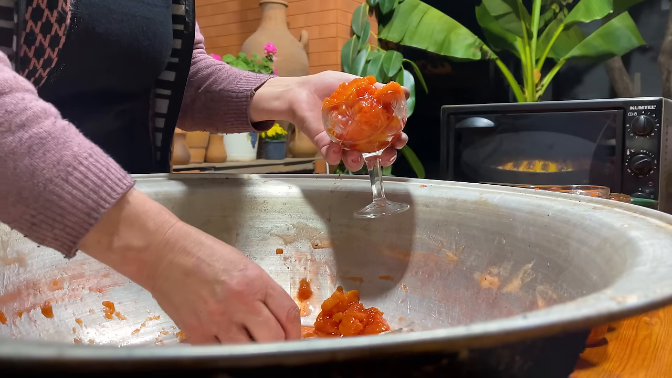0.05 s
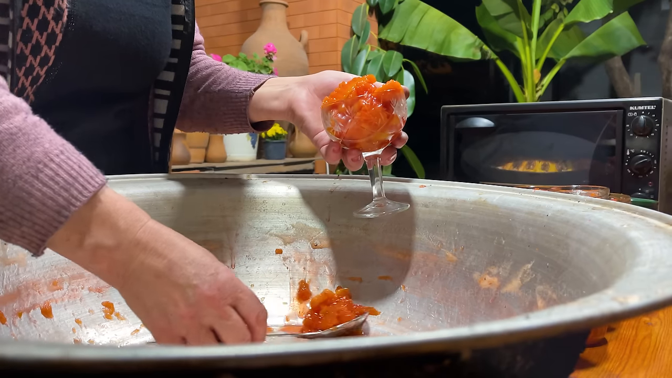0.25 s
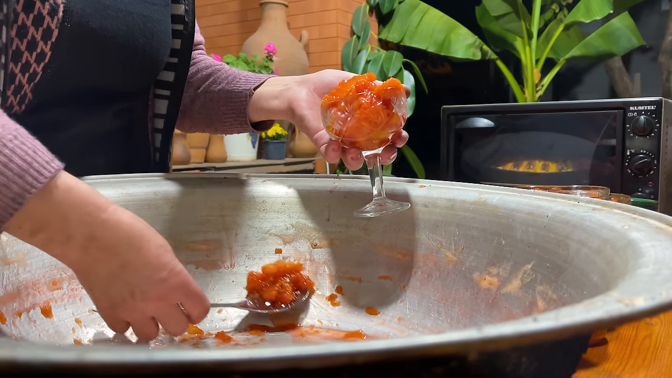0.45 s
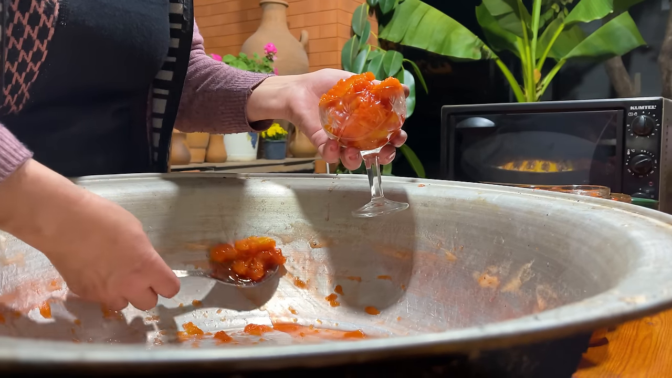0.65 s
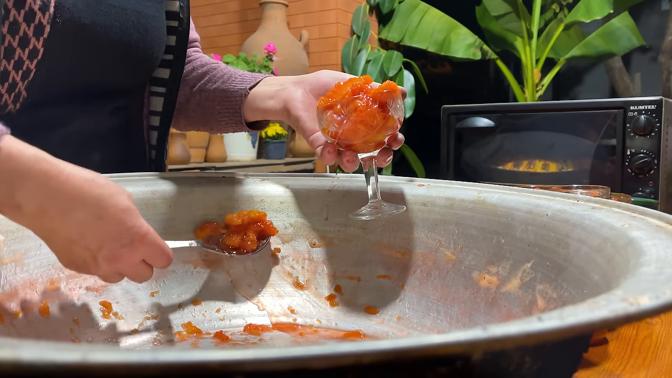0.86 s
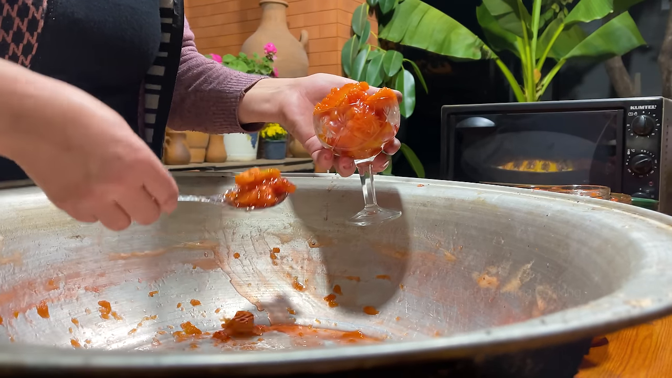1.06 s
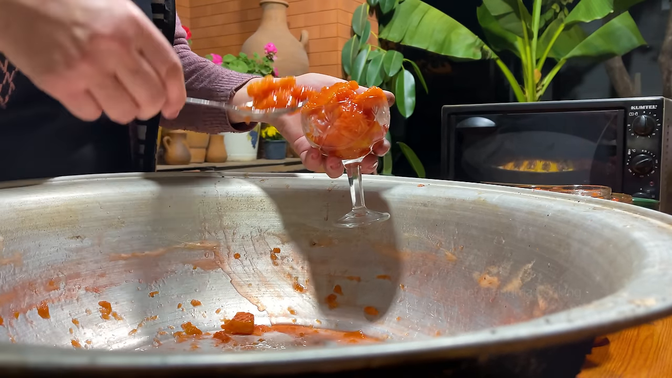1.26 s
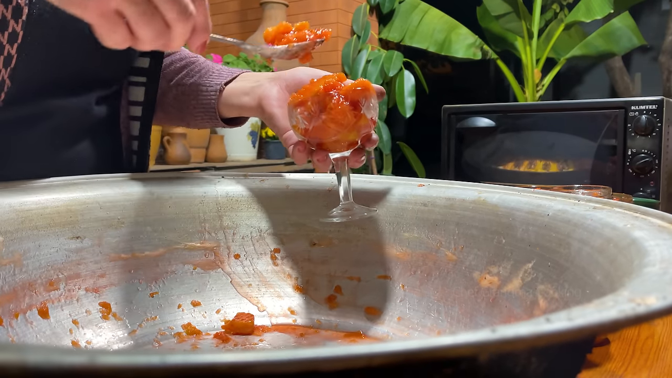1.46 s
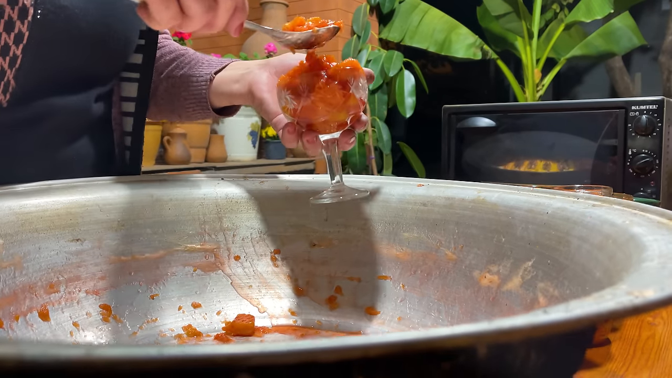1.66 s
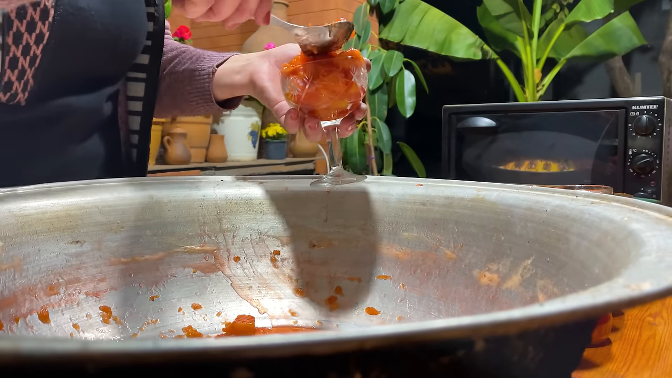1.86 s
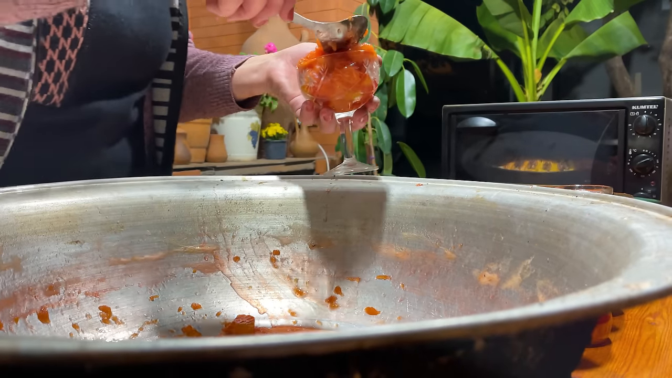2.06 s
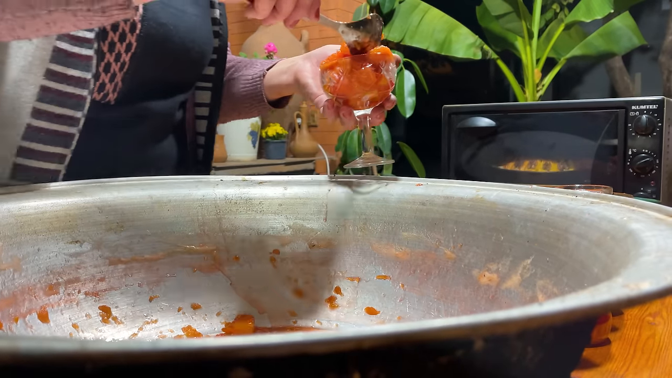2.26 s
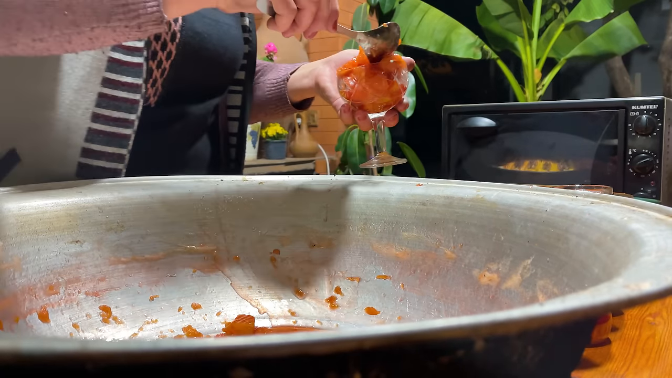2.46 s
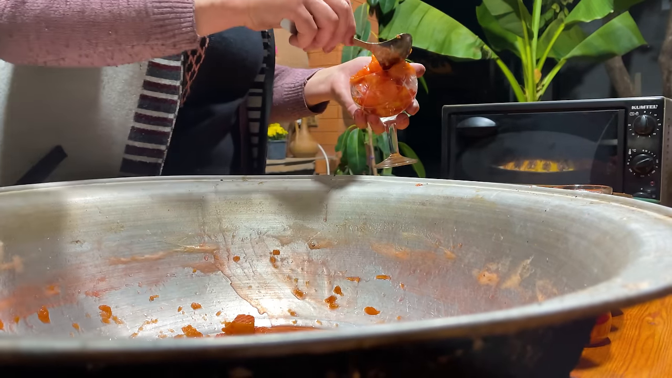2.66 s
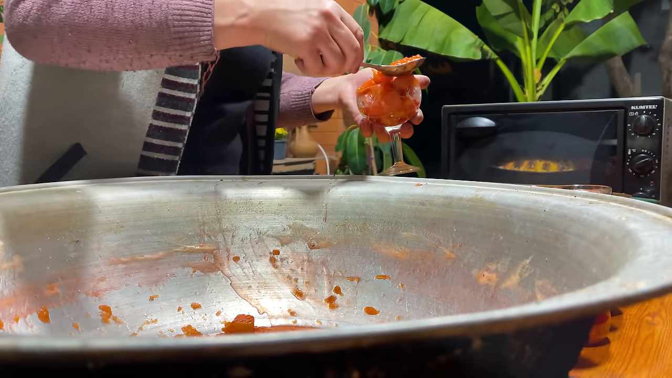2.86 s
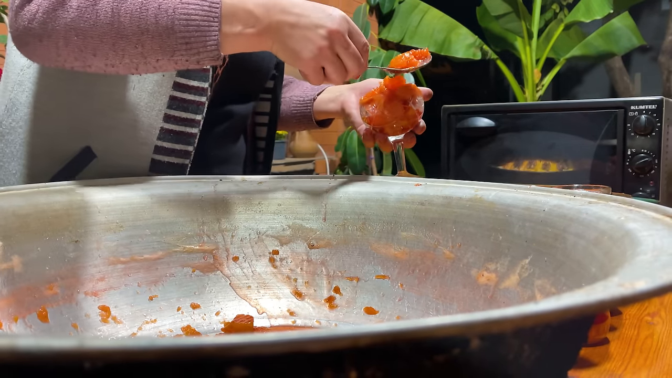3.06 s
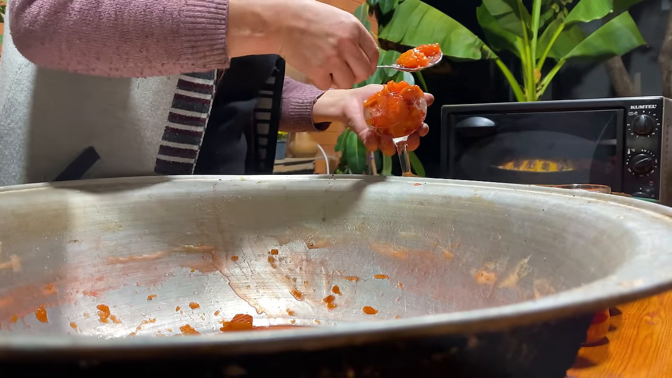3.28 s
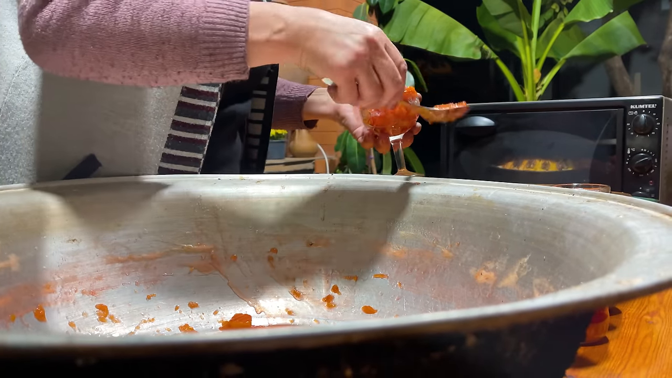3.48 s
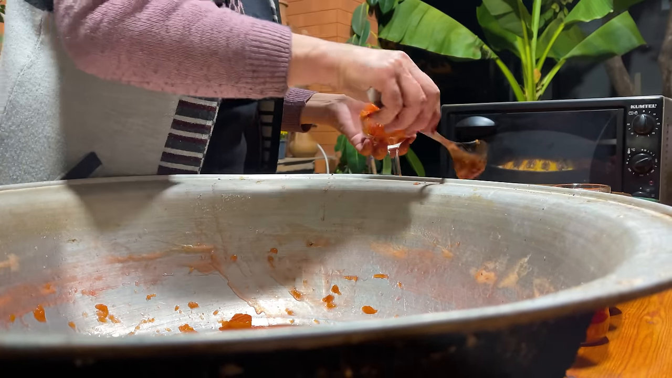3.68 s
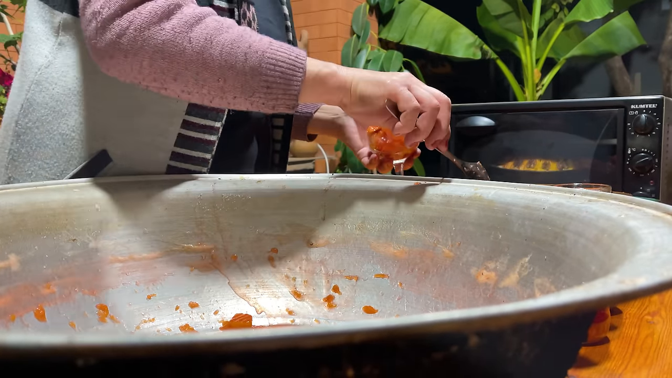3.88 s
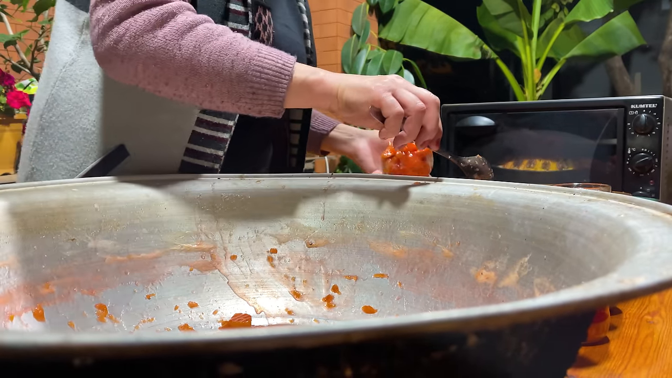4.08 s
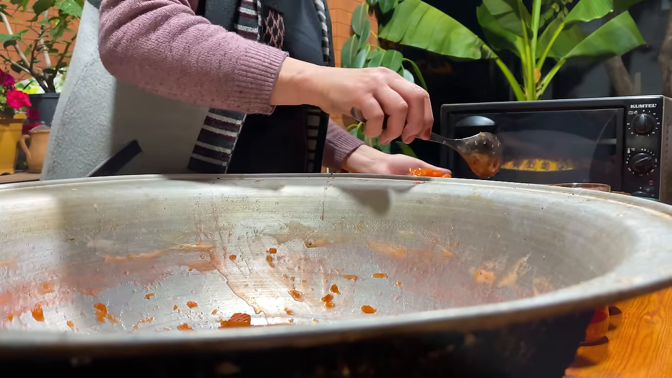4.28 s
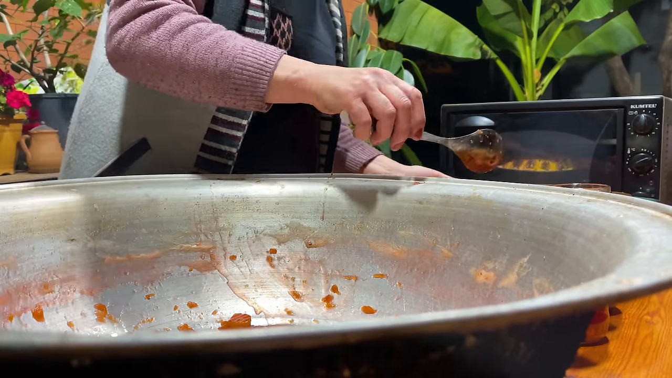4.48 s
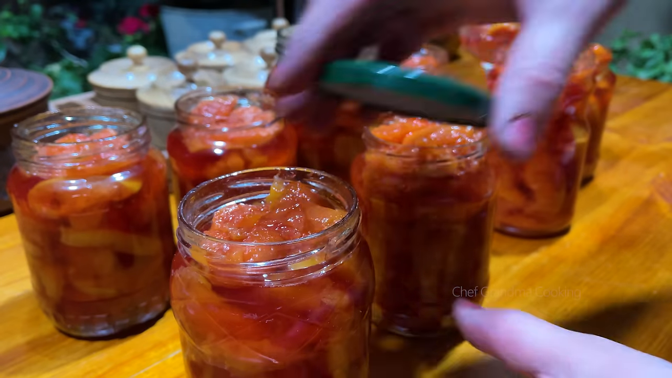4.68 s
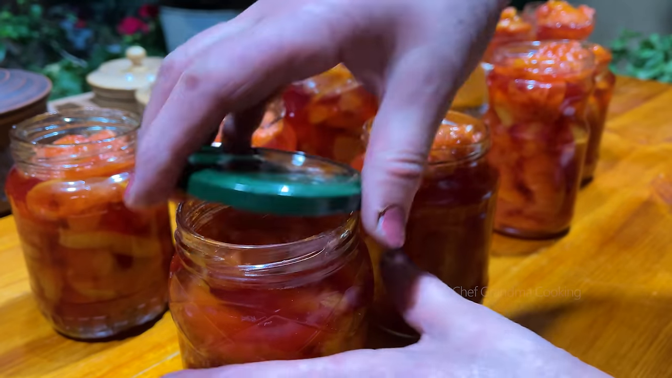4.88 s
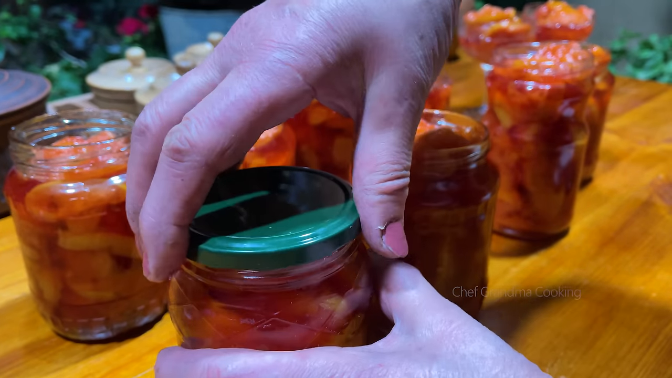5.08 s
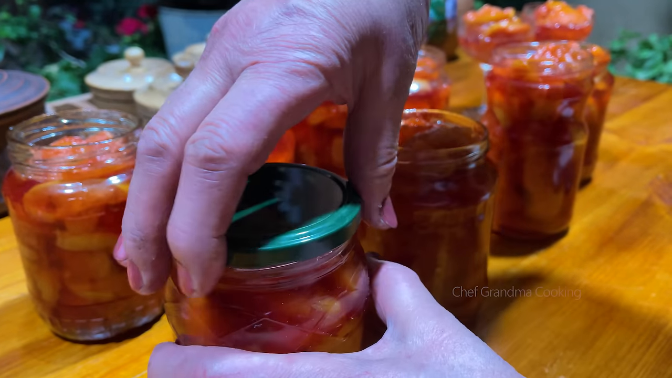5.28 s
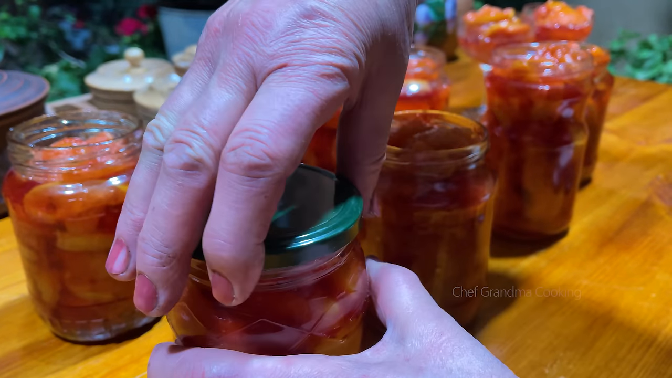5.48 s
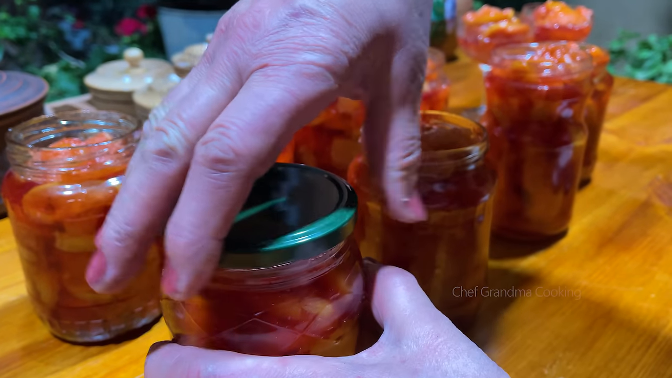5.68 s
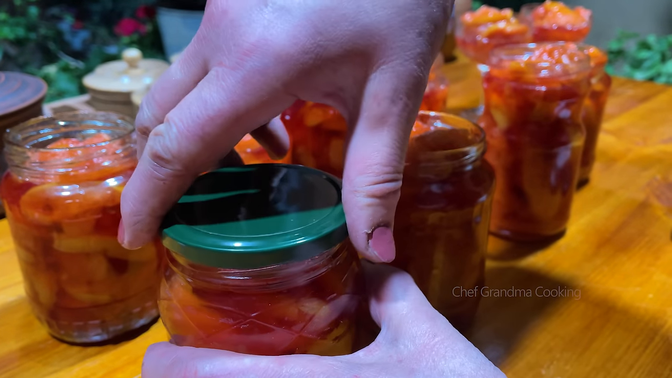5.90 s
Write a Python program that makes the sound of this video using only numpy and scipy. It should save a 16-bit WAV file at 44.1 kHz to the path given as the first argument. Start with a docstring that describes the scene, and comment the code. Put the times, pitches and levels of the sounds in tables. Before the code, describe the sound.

Close phone recording in a small soft kitchen. A spoon clatters and scrapes in a large metal basin for half a second, then ticks lightly on a stemmed glass. Cloth rustles faintly through a quiet stretch with two dull knocks. A glass is set hard on a wooden table, the loudest sound, and then a tin lid drops on a jar and is twisted shut with fine clicks, creaks and a low judder.

```python
"""A spoon taps and scrapes jam from a wide metal basin, then ticks on a stemmed glass while sleeves rustle.
The glass is set down on a wooden table; then a tin lid drops on a jar and is twisted shut in small clicks.
Blows are short pushes into ringing modes; rubbing is uneven slip noise, most of it through such modes.
A soft room and a low rumble surround it all, heard through the two microphone ports of a phone."""
import sys
import numpy as np
from scipy import signal
from scipy.fft import rfft, irfft
from scipy.io import wavfile
from scipy.ndimage import uniform_filter1d

SR = 44100
rng = np.random.default_rng(int(sys.argv[2]) if len(sys.argv) > 2 else 0)


def undo_db(level):
    """Turn decibels back into plain size, where 20 dB means ten times bigger."""
    steps = np.asarray(level, float) / 20
    return 10 ** steps


def wrap_up_sound(samples):
    """Save the sound to the file named by the first command line argument, as 16-bit audio."""
    columns = np.atleast_2d(samples).T
    # keep every value between -1 and 1, then stretch to whole-number steps
    tamed = np.clip(columns, -1, 1)
    steps = np.round(tamed * 32767).astype(np.int16)
    wavfile.write(sys.argv[1], SR, steps)


N = 261954


def curve(table):
    """Draws a (seconds, value) table as straight lines, sample by sample."""
    return np.interp(np.arange(N) / SR, *np.transpose(table))


def colour(x, points):
    """Filters by (Hz, dB) points, joined evenly over log frequency."""
    hz, db = np.transpose(points)
    f = np.fft.rfftfreq(N, 1 / SR) + 1
    gain = undo_db(np.interp(np.log(f), np.log(hz), db))
    return irfft(rfft(x) * gain, N)


def band(x, lo_hz, hi_hz):
    """Band-passes to unit rms."""
    y = signal.sosfilt(signal.butter(2, [lo_hz, hi_hz], "band", fs=SR, output="sos"), x)
    return y / np.sqrt(np.mean(y ** 2))


def cut_top(x):
    """Steep low-pass at 12.4 kHz."""
    return signal.sosfilt(signal.butter(8, 12400, fs=SR, output="sos"), x)


def walk(rate):
    """Random levels, rate new ones a second, slewed from one to the next; spread near 1."""
    hold = int(SR / rate)
    steps = np.repeat(rng.standard_normal(N // hold + 1), hold)
    return 1.6 * uniform_filter1d(steps, hold)[:N]


def grit(share, spread_db):
    """Sparse slips of very uneven size, common to both ports, over a fine noise of each port's own."""
    biggest = 3  # in spreads above the smallest
    size = undo_db(spread_db * np.minimum(rng.exponential(size=N), biggest))
    slips = (rng.random(N) < share) * size * rng.standard_normal(N)
    return slips + 0.37 * np.std(slips) * rng.standard_normal((2, N))


def swells(rows, bright=0, linger=1):
    """Gain of gestures that rise, hold and fade evenly in dB; bright weights the brightness column."""
    rise_share = 0.44  # a swell takes this share of the fade time
    grid_s, power = np.arange(0, N / SR + .001, .001), 0
    for s, hold, fade, db, *shine in rows:
        fade = max(fade, .005) * linger
        before = np.maximum((s - grid_s) / (rise_share * fade), 0)
        after = np.maximum((grid_s - s - hold) / fade, 0)
        power = power + undo_db(2 * (db + bright * sum(shine) - 20 * (before + after)))
    return np.interp(np.arange(N) / SR, grid_s, np.sqrt(power))


def ring(modes, blur, scatter_db=0, *spots_hz, rise_s=.00069):
    """Tap response at two ports: each mode arrives in its own phase, countless small modes blur into noise."""
    hz, width, db = np.transpose(modes)[:, :, None, None]
    t = np.arange(int(SR * min(1.5, max(2 / width.min(), .25)))) / SR
    db = db + scatter_db * rng.standard_normal(db.shape)
    for spot_hz in spots_hz:  # the spot that is hit favours modes near this pitch
        db = db + 13.8 * np.exp(-(np.log(hz / spot_hz) / 0.089) ** 2)
    # the ports differ more in phase towards the treble
    turn = rng.uniform(-1, 1, (len(hz), 1, 1)) * np.clip(hz / 600, 0, 1.6) * np.array([[.5], [-.5]])
    decay = np.exp(-np.pi * width * t)
    tones = undo_db(db) * np.sqrt(width) * decay * np.sin(2 * np.pi * hz * t + turn)
    out = tones.sum(0) / np.sqrt(np.sum(undo_db(2 * db) * width))
    for mid_hz, blur_db, t60 in blur:
        octave = band(rng.standard_normal((2, len(t))), mid_hz / np.sqrt(2), mid_hz * np.sqrt(2))
        out = out + undo_db(blur_db) * octave * np.exp(-np.log(1000) * t / t60)
    return out * np.minimum(t / rise_s, 1)


def unit(response):
    """Scales a response so that steady noise passes at its own level."""
    return response / np.sqrt(np.mean(np.sum(response ** 2, 1)))


def strike(blows, modes, blur, scatter_db, **rise):
    """Each blow is a short smooth push; a longer contact reaches fewer high modes."""
    out = np.zeros((2, N + 2 * SR))
    for s, db, ms, *spots_hz in blows:
        u = np.arange(1, SR // 100) / (max(ms, .005) * SR / 1000)
        push = u * np.exp(-u)
        sound = signal.fftconvolve(ring(modes, blur, scatter_db, *spots_hz, **rise), push[None])
        i = int(s * SR)
        out[:, i:i + sound.shape[1]] += undo_db(db) * sound / abs(sound[0]).max()
    return out[:, :N]


def rub(force, response):
    """Passes a lasting force through an object's response."""
    return signal.fftconvolve(force, response, axes=1)[:, :N]


# Spectrum of the room tone. Each row: frequency in Hz, relative density in dB per Hz.
AIR = [(15, -63), (25, -29.5), (41, -10), (69, -4.5), (90, -14), (125, -15.5), (160, -21), (257, -24),
       (285, -28), (333, -23), (481, -33.5), (520, -29), (1050, -31.5), (1230, -30.5), (4560, -55),
       (9250, -63), (13000, -70)]
# Loudness of the room tone. Each row: time in seconds, level in dB.
AIR_LEVEL = [(0, -44.5), (1, -53), (2, -52), (3, -52), (4.1, -52.5), (4.8, -48.5), (5.94, -46.5)]


def air():
    """Room tone: noise shaped to a low rumble and thin hiss, the rumble wavering more and faster."""
    tone = colour(rng.standard_normal((2, N)), AIR)
    low = signal.sosfilt(signal.butter(2, 140, fs=SR, output="sos"), tone)
    tone = low * undo_db(1.5 * walk(7)) + (tone - low) * undo_db(.7 * walk(4))
    return undo_db(curve(AIR_LEVEL)) * tone / np.std(tone)


# Far peeps. Each row: start in seconds, length in seconds, first pitch in Hz, last pitch in Hz, level in dB.
CHIRPS = [(2.895, .045, 2350, 3450, -70), (4.672, 0.04, 2400, 2960, -64)]


def chirps():
    """Faint rising peeps from far off: gliding tones with a weak octave, unsteady in pitch and level."""
    wobble_hz, flutter_db = 70, 4
    out = np.zeros(N)
    for s, length, from_hz, to_hz, db in CHIRPS:
        u = np.arange(int(length * SR)) / (length * SR)
        wobble, flutter = walk(300)[:len(u)], walk(195)[:len(u)]
        pitch = from_hz + (to_hz - from_hz) * u ** 0.98 + wobble_hz * wobble
        phase = 2 * np.pi * np.cumsum(pitch) / SR
        tone = np.sin(phase) + 0.067 * np.sin(2 * phase)
        out[int(s * SR):][:len(u)] += undo_db(db + flutter_db * flutter) * np.sin(np.pi * u ** 0.4) * tone
    return out


# Moves of sleeves and fingers. Each row: time of full level in seconds, hold in seconds,
# time to fade 20 dB in seconds (5 ms at least), level in dB, brightness in dB.
RUSTLES = [(.64, 0.0024, 0.031, -56, 6), (.755, 0.0087, 0.03, -55.5, -3), (.798, .002, 0.072, -58, -6),
           (.958, 0.022, 0.082, -82, 14.5), (1.118, .004, 0.066, -64, 7.5),
           (1.182, 0.0024, 0.028, -58, -10), (1.584, 0.0017, 0.025, -80, 10), (1.73, .03, 0.3, -68.5, -11),
           (1.8, .57, .06, -74, -4), (2.48, 0.028, 0.13, -69, -5), (2.62, 0.0019, 0.08, -62, -3),
           (3.03, .01, 0.074, -56.5, -7), (3.33, .002, 0.042, -77.5, -6.5), (3.51, .002, 0.043, -71.5, -7),
           (3.63, .002, 0.075, -71, -22), (3.79, .002, .12, -77, -1), (4.38, .03, 0.055, -86, -17.5),
           (5.025, .002, 0.067, -54.5, -11), (5.116, 0.079, 0.14, -71, -10), (5.35, .002, .15, -85, -9),
           (5.48, 0.038, 0.14, -64, -7), (5.6, 0.026, 0.073, -71, 2), (5.71, .002, .03, -72, -12),
           (5.838, 0.028, 0.063, -63.5, -8)]


def rustle():
    """Knitted cloth and skin: soft dense crackle, patchy, kept below about 12.4 kHz."""
    fibres = grit(.3, 1.8) * undo_db(1.5 * walk(40))
    body, sheen = band(fibres, 1500, 7300), band(fibres, 5800, 13600)
    return cut_top(1.24 * swells(RUSTLES) * body + undo_db(0.5) * swells(RUSTLES, 0.97) * sheen)


# Modes of the metal basin. Each row: frequency in Hz, width in Hz, level in dB.
BASIN = [(124.8, 0.97, -3.5), (205, 14, -14), (298.4, 11.4, -11), (352.7, 5.2, -12.5), (385, 24.3, -5.5),
         (402.8, 5.5, -4), (452, 9.6, -10), (515, 17, -10.5), (557.4, 11, -11), (624, 24, -10),
         (660, 6, -3.5), (790, 9, -14.5), (854, 12, -9.5), (1002, 19, -16), (1172, 17, -12.5),
         (1234, 30, -9.5), (1258, 26, -17), (1346, 15, -9), (2060, 18, -27), (2550, 97, -3.5),
         (2838, 34.2, -7.5), (3515, 50, -13), (3280, 42, -11), (3370, 60, -7), (3085, 60, -9),
         (2300, 60, -12.5), (3670, 30, -18.5), (3940, 19, -14.5), (4330, 100, -8.5), (4850, 57, -6)]
# The basin's blur of small modes. Each row: octave centre in Hz, level in dB, T60 in seconds.
BASIN_BLUR = [(296, -17, 0.3), (594, -10, 0.1), (1190, -13.5, 0.041), (2400, -5.5, 0.061),
              (4630, 1.5, 0.04), (8750, -3, 0.031), (14530, -82, .02)]
# Taps on the basin. Each row: start in seconds, peak in dB, contact in ms,
# and in some rows the pitch in Hz favoured by the spot that is hit.
BASIN_TAPS = [(.0060, -13.5, .03), (.0115, -21, .3, 395), (.0423, -28, .03), (.0623, -25, .025),
              (.0765, -29, .03), (.0945, -28, .03), (.1635, -37, .04), (.2234, -31, .04),
              (.3878, -28.5, .05), (.4065, -25, .07), (.4255, -31, .016), (.4592, -22.5, .07),
              (.4720, -22, .08), (.5115, -38, .09, 400), (.6342, -36, .11), (.7205, -43, .03),
              (.7545, -46, .04), (.7932, -31.5, .11), (.8035, -37, .13, 400), (1.087, -48, .4),
              (1.113, -46, .25, 700)]
# Strokes of the spoon's edge. Each row: time of full level in seconds, hold in seconds,
# time to fade 20 dB in seconds (5 ms at least), level in dB, brightness in dB.
STROKES = [(.02, 0.0059, -0.03, -28.5, -5), (.042, 0.059, 0.09, -32, 4), (.165, 0.074, 0.08, -37, 1.5),
           (.228, 0.095, 0.03, -35, 0.5), (.385, 0.036, 0, -37.5, -2.5), (.465, 0.0052, -0.1, -47, 10)]


def basin():
    """Taps, and the spoon's edge slipping over the metal; as it travels, other modes answer."""
    slips = grit(0.07, 3.46) * undo_db(1.2 * walk(200))
    # the spoon's weight leaves the metal more slowly than its edge
    pressure = undo_db(-9.0) * swells(STROKES, linger=1.92) * band(slips, 240, 1830)
    chatter = undo_db(-9) * swells(STROKES, 0.98) * band(slips, 2500, 3980)
    hiss = undo_db(-9) * swells(STROKES, 0.29) * band(slips, 4830, 12400)
    force = cut_top(pressure + chatter + hiss)  # scraping kept below about 12.4 kHz
    blur = [(hz, db + 0.5, 0.5 * t60) for hz, db, t60 in BASIN_BLUR]  # rubbing stirs the small modes most
    out = strike(BASIN_TAPS, BASIN, BASIN_BLUR, 2.64)
    travel_s = .6  # the scraping is over by then; taps go on
    stretch = 2048  # samples of travel between one patch of metal and the next
    for i in range(0, int(travel_s * SR), stretch):
        patch = force[:, i:i + 2 * stretch] * np.hanning(2 * stretch) ** .5
        sound = rub(patch, unit(ring(BASIN, blur, 3.5)))
        out[:, i:i + sound.shape[1]] += sound
    return out


# Modes of spoon on glass. Each row: frequency in Hz, width in Hz, level in dB.
SPOON = [(1350, 24, -8), (1750, 72, -7), (2050, 103, 2), (2316, 57, 6), (2500, 89, 9), (2630, 53, 5.5),
         (2810, 100, 4.5), (3005, 110, 4), (3780, 50, -6), (4530, 60, -12), (7680, 85, 14), (8950, 80, -6),
         (10200, 150, -0.5)]
# The spoon's blur of small modes. Each row: octave centre in Hz, level in dB, T60 in seconds.
SPOON_BLUR = [(1190, -35, 0.1), (2510, -15, 0.091), (4750, -11, 0.069), (9650, -0.5, 0.039),
              (13900, -20, 0.016)]
# Ticks. Each row: start in seconds, peak in dB, contact in ms, one or two pitches in Hz favoured by the spot.
SPOON_TICKS = [(1.15, -34.5, 0.1, 2500), (1.12, -25.5, 0.053, 2450), (1.12, -32.5, 0.1, 2800),
               (1.1078, -37, 0.4, 2600), (1.113, -37.5, 0.2, 2550), (1.12, -39.5, 0.1, 2999),
               (1.75, -26, 0.1, 2840), (3, -47, 0.3, 1750.5, 1749.5)]


def spoon():
    """The spoon ticks on the stemmed glass; jam on it softens the onset."""
    return strike(SPOON_TICKS, SPOON, SPOON_BLUR, 1.1, rise_s=0.0011)


# Ringing of the table top. Each row: frequency in Hz, level in dB, T60 in seconds.
TABLE = [(87.3, -16, .6), (100.7, -3, 0.27), (120.5, -13, 0.37), (160.8, -8, 0.35), (168.5, -5.5, 0.6),
         (205.6, -7.5, 0.49), (231.5, -11.5, .4), (252, -12, .2), (299, -10, 0.46), (357.8, 0, 0.18),
         (384, -3.5, 0.32), (404, -9.5, 0.35), (429, -16, 0.52), (452, -6, 0.33), (470.6, -0.5, 0.084),
         (548, -5, 0.19), (660, -4, 0.083), (741, -14, .22), (845, -10, 0.07), (1000, -12, 0.079),
         (1185, -10, 0.14), (1296, -13, .1), (1680, -12, 0.13), (2140, -12.5, .1)]
# The wood's blur of small modes. Each row: octave centre in Hz, level in dB, T60 in seconds.
TABLE_BLUR = [(190, -23.5, 0.72), (373, -18.5, 0.48), (600, -3, 0.064), (1200, -2.5, 0.077),
              (2400, -11.5, 0.1), (4730, -22.5, 0.23), (7900, -22, 0.15)]
# Dull knocks: two early ones of glass on basin or spoon, then the glass set on wood.
# Each row: start in seconds, peak in dB, contact in ms, pitch in Hz favoured by the spot.
DULL_KNOCKS = [(1.7445, -27, 0.23, 345), (1.8655, -29, 0.24, 339), (4.423, -40.5, .15, 800),
               (4.4345, -13, 0.033, 1680), (4.437, -9, 0.13, 660), (4.441, -5, 0.29, 374.4),
               (4.458, -16.5, 0.26, 390), (4.481, -22.5, 0.32, 388), (4.495, -21, 0.28, 452)]
# Modes of the glass bowl. Each row: frequency in Hz, width in Hz, level in dB.
GLASS = [(4950, 30, -8), (5040, 12, -7), (5110, 12, -4), (5170, 11, -5), (5200, 12, -6.5), (5340, 25, -8)]
# Ticks that make the bowl sing. Each row: start in seconds, peak in dB, contact in ms.
GLASS_TICKS = [(4.4345, -37, .02)]


def glass_knocks():
    """Two early dull knocks, then the glass set on wood while its bowl sings; the wood's modes voice all knocks."""
    # T60 becomes mode width; the level term offsets the width weighting in ring()
    wood = [(hz, np.log(1000) / (np.pi * t60), db + 10 * np.log10(t60)) for hz, db, t60 in TABLE]
    return strike(DULL_KNOCKS, wood, TABLE_BLUR, 1.9) + strike(GLASS_TICKS, GLASS, [], 0.87)


# Modes of the jar on wood. Each row: frequency in Hz, width in Hz, level in dB.
JAR_ON_WOOD = [(99.6, 33, -8), (140, 20, -7.5), (202, 26, -5), (286, 15, -14.5), (387, 23, -13)]
# Low rumble left ringing after the table knock, then the jar creeping. Each row: time of full level
# in seconds, hold in seconds, time to fade 20 dB in seconds (5 ms at least), level in dB.
LOW_RUMBLES = [(4.72, 0.023, 0.047, -49), (5.01, .01, 0.044, -45), (5.08, 0.021, 0.021, -49),
               (5.13, 0.18, .2, -59.5), (5.42, 0.044, 0.085, -52.5), (5.6, 0.31, 0.18, -56)]


def low_rumbles():
    """The table knock's last rumble, then the turning jar's grind: rough noise through low modes."""
    rough = swells(LOW_RUMBLES) * undo_db(.8 * walk(30)) * rng.standard_normal(N)
    return rub(rough[None], undo_db(3.5) * unit(ring(JAR_ON_WOOD, [])))


# The jar humming on the wood. Each row: time of full level in seconds, hold in seconds,
# time to fade 20 dB in seconds, level in dB.
JAR_HUM = [(5.08, .04, 0.6, -63), (5.4, 0.34, 0.2, -52.5), (5.82, .12, 0.5, -55.5)]


def jar_hum():
    """The jar's base judders on the wood while the lid tightens: a wavering hum, its octave and its half."""
    hum_hz, waver = 200.3, 0.022  # waver: share of the pitch
    octave_db, half_db = -11.5, -6.5
    phase = 2 * np.pi * np.cumsum(hum_hz * (1 + waver * walk(7.2))) / SR
    tone = np.sin(phase) + undo_db(octave_db) * np.sin(2 * phase) + undo_db(half_db) * np.sin(.5 * phase)
    return swells(JAR_HUM) * undo_db(1.8 * walk(13)) * tone


# Modes of the tin lid. Each row: frequency in Hz, width in Hz, level in dB.
LID = [(850, 200, -9), (1100, 104, 2.5), (1400, 160, 2.5), (1598, 150, 5.5), (1800, 110, -0.5),
       (2400, 110, -5), (3120, 63, -4), (3540, 72, -5.5), (4100, 59, -12), (4800, 200, -14),
       (5550, 150, -13), (6000, 170, -11), (7800, 200, -26), (10580, 130, 8), (11600, 260, -18)]
# The lid's blur of small modes. Each row: octave centre in Hz, level in dB, T60 in seconds.
LID_BLUR = [(1445, -19.5, 0.044), (2860, -22.5, 0.053), (5100, -18.5, 0.043), (8760, -15.5, 0.015),
            (14800, 1.5, 0.013)]
# Lid clicks. Each row: start in seconds, peak in dB, contact in ms, two pitches in Hz favoured by the spot.
LID_CLICKS = [(4.9312, -44, 0.03, 3120, 3120), (4.9522, -17, 0.046, 1554, 3120),
              (4.9585, -42, .05, 1490, 3120), (4.9695, -29.5, 0.087, 1490, 1800),
              (4.9748, -25.5, 0.02, 1500, 4100), (4.9785, -29, 0.022, 4100, 5900),
              (4.987, -45, 0.022, 2400, 7800), (4.9928, -27, 0.019, 5550, 5900),
              (4.9965, -33, .03, 4100, 1100), (5.0035, -41, .04, 1800, 4100),
              (5.0108, -21.5, 0.06, 1100, 1400), (5.0148, -21.5, 0.025, 1100, 4100),
              (5.0205, -32, 0.097, 850, 1100), (5.029, -39, .08, 1100, 1490),
              (5.038, -41, 0.088, 1100, 1800), (5.0569, -35, 0.14, 1100, 850),
              (5.0986, -28.5, 0.019, 1100, 3120), (5.102, -34, .03, 1100, 4100),
              (5.1198, -38.5, 0.022, 1800, 7800), (5.14, -45, 0.087, 1100, 1490),
              (5.189, -48, .04, 1480, 4100), (5.238, -50, 0.055, 1100, 4100),
              (5.2724, -44.5, .06, 1100, 4100), (5.295, -49.5, .08, 1490, 1800),
              (5.3279, -50, .1, 1100, 850), (5.3515, -40, 0.095, 1490, 1800),
              (5.4166, -41.5, 0.12, 1100, 1490), (5.446, -44, 0.1, 1800, 1490),
              (5.455, -47, .08, 1800, 1490), (5.6377, -54, .1, 1100, 1100),
              (5.6969, -21.5, 0.067, 1750, 3120), (5.7144, -47, 0.11, 1800, 3540),
              (5.727, -46, 0.11, 1100, 1800), (5.7394, -49, 0.14, 1100, 1490),
              (5.756, -47.5, .12, 1100, 1100), (5.8833, -41.5, 0.056, 1800, 2400),
              (5.907, -37.5, 0.14, 1490, 1100)]
# Thread friction. Each row: time of full level in seconds, hold in seconds,
# time to fade 20 dB in seconds (5 ms at least), level in dB.
LID_TURNS = [(4.93, .03, -0.8, -59), (4.97, .05, -0.22, -56), (5.125, 0.29, -0.4, -63.5),
             (5.47, 0.53, 0.5, -68)]


def lid():
    """Lugs click over the glass thread; as it turns, the tin creeps with fine slips."""
    creep = swells(LID_TURNS) * undo_db(2.0 * walk(73)) * band(grit(0.043, 2.6), 710, 3550)
    # the lugs meet the thread one after another, hence the slow rise
    clicks = strike(LID_CLICKS, LID, LID_BLUR, 1.3, rise_s=0.0015)
    return clicks + rub(creep, unit(ring(LID, LID_BLUR)))


def room(source):
    """Soft small-room reverberation: a decaying noise tail at each port."""
    t60_s, gap_s = 0.28, .004
    t = np.arange(int(.5 * SR)) / SR
    tail = rng.standard_normal((2, len(t))) * np.exp(-np.log(1000) * t / t60_s) * (t > gap_s)
    tail = signal.lfilter([1], [1, -.6], tail)  # walls swallow the treble
    return rub(source, unit(tail))


def scene():
    """All sources in a small, soft room; lid and spoon are close and carry less of it."""
    far = basin() + glass_knocks() + low_rumbles() + jar_hum() + rustle() + chirps()
    close = lid() + spoon()
    near = far + close + undo_db(-11.5) * room(far + undo_db(-7.5) * close)
    # deep bass is left to the room tone
    return signal.sosfilt(signal.butter(4, 85, "high", fs=SR, output="sos"), near) + air()


def top_cut(x):
    """Nothing passes above the cut-off."""
    return signal.sosfilt(signal.butter(12, 16500, fs=SR, output="sos"), x)


# Right port against the left. Each row: frequency in Hz, weakening in dB.
RIGHT_PORT = [(60, 2), (200, 2.8), (500, 1), (1000, 5), (2000, 4), (4500, 8), (7000, 5)]
# Microphone response. Each row: frequency in Hz, gain in dB.
MIC = [(25, -19), (55, -1.5), (6000, 1.5), (7500, -3), (10300, 5), (11600, 1), (12400, -31), (14000, -22),
       (15500, -13)]


def record(dry):
    """The ports share the bass; the top octave comes from one port, late and inverted on the left."""
    f = np.fft.rfftfreq(N, 1 / SR) + 1
    left, right = rfft(dry)
    bass = 1 / (1 + (f / 450) ** 2)
    top = np.clip((f - 6000) / 3200, 0, 1)
    hz, weaker_db = np.transpose(RIGHT_PORT)
    right = bass * left + np.sqrt(1 - bass ** 2) * right
    right = right * undo_db(-np.interp(np.log(f), np.log(hz), weaker_db))
    early = np.exp(2j * np.pi * f * 3 / 10250)  # the right leads by 3 / 10250 s
    right = np.sqrt(1 - top ** 2) * right - top * left * early
    ports = irfft(np.array([left, right]), N)
    return top_cut(colour(ports, MIC))


dry = scene()
out = record(dry)
wrap_up_sound(out)
```